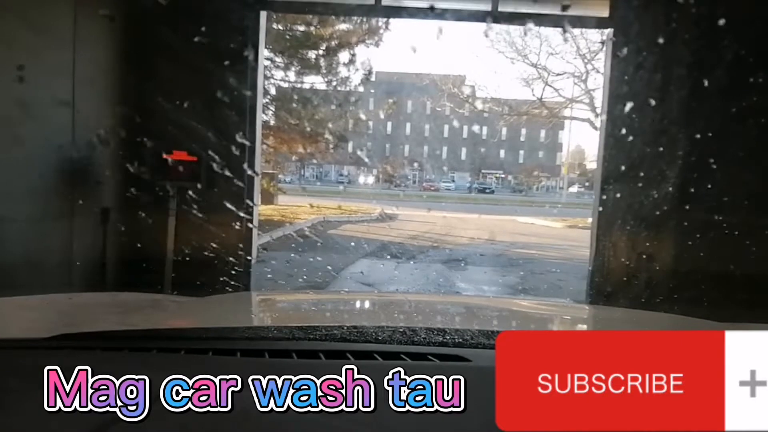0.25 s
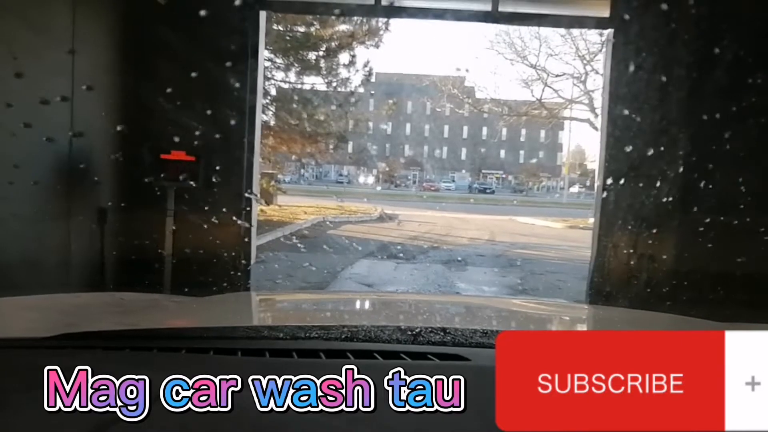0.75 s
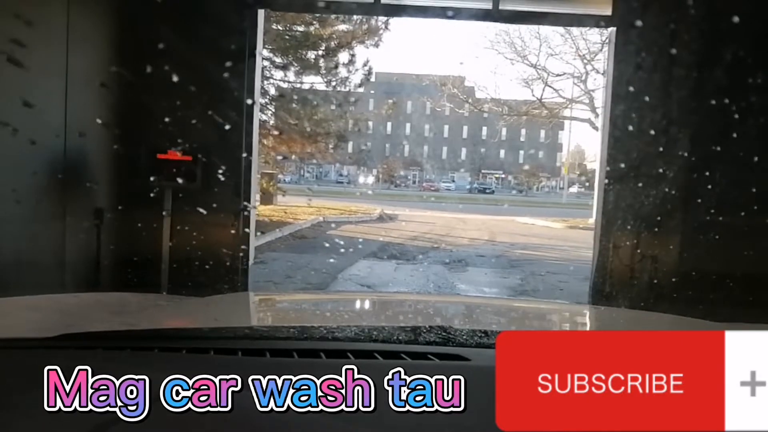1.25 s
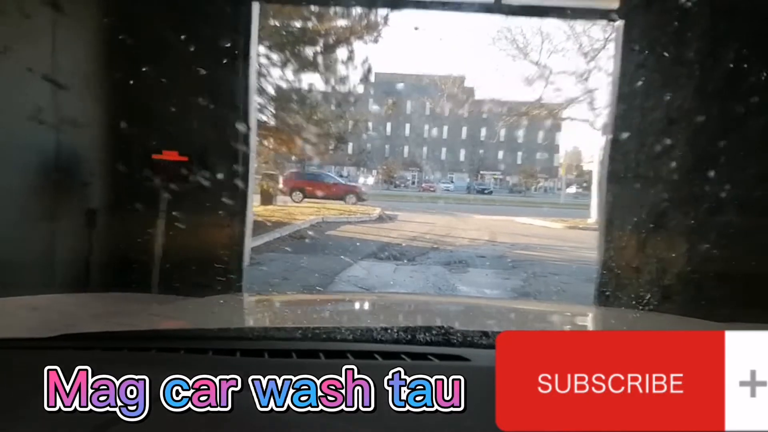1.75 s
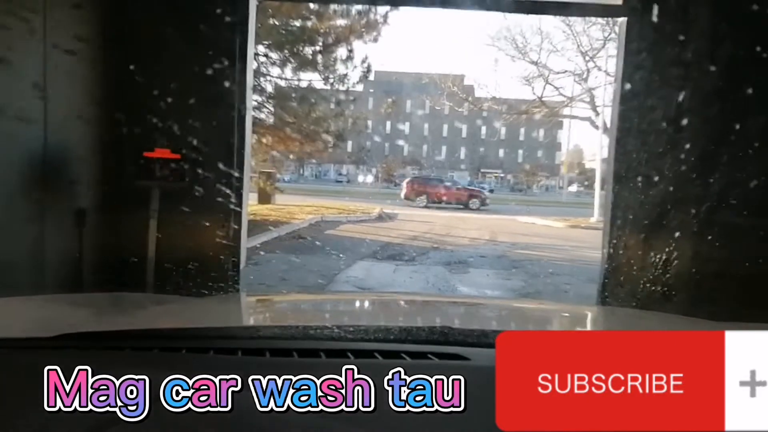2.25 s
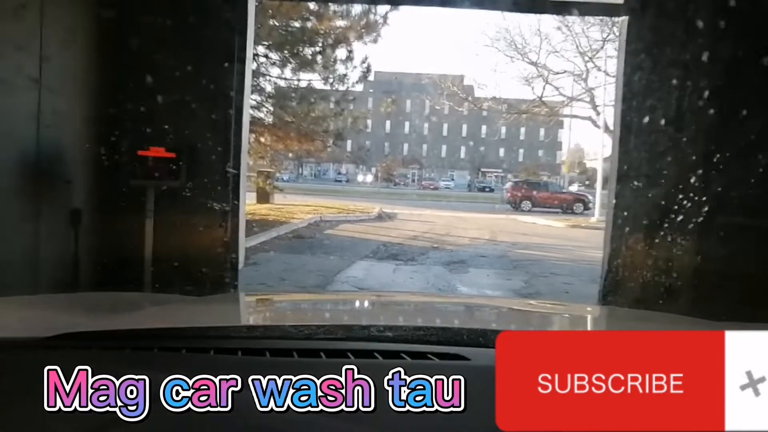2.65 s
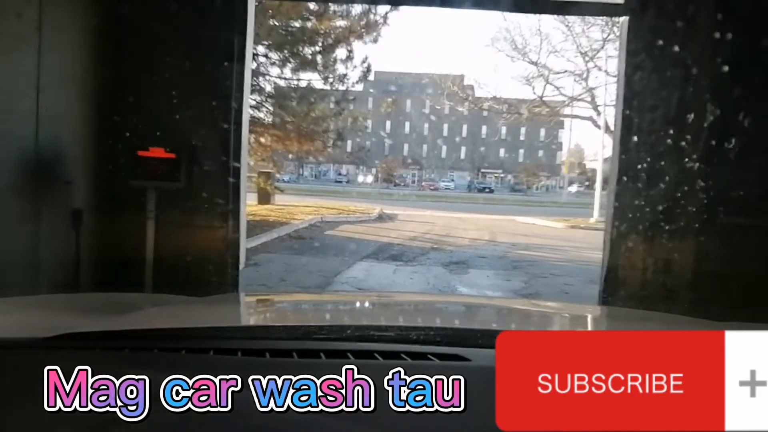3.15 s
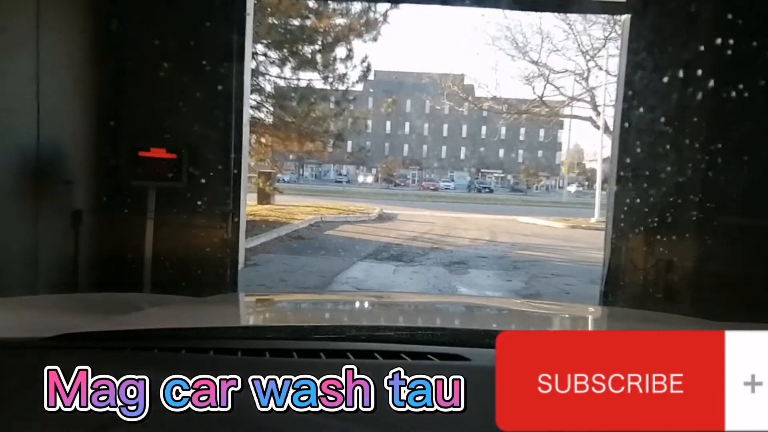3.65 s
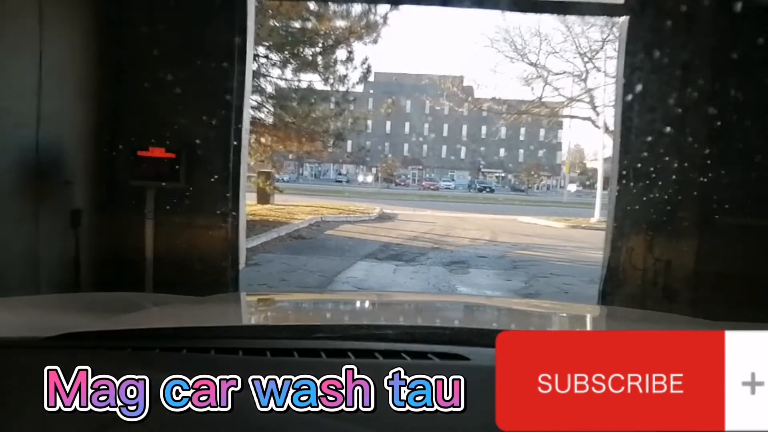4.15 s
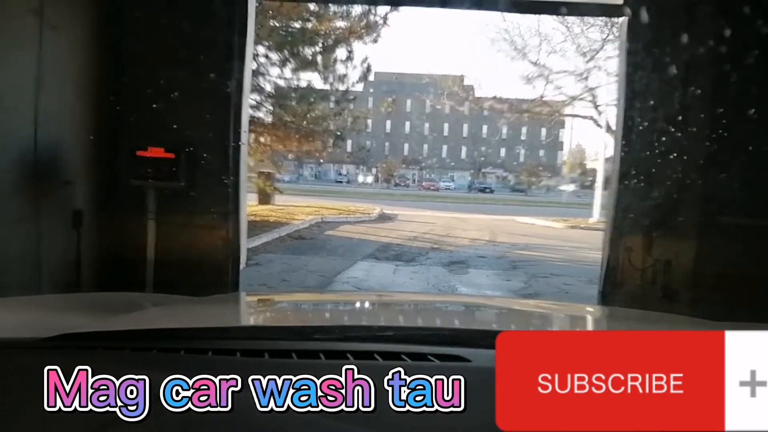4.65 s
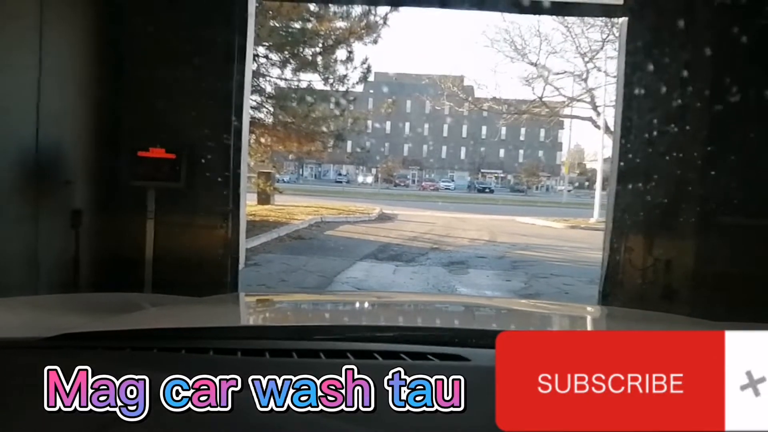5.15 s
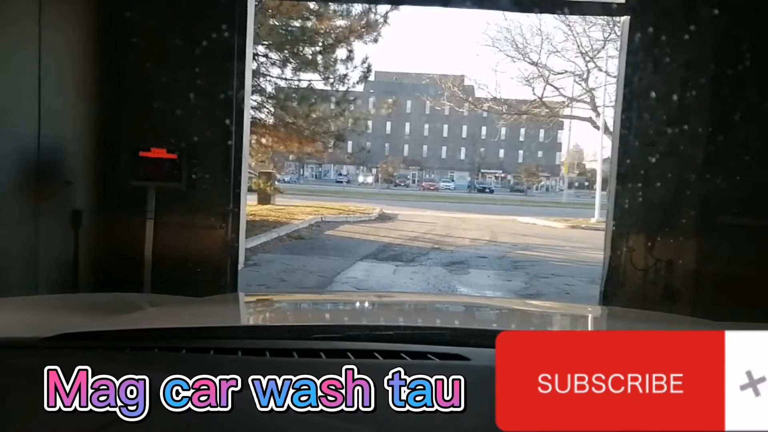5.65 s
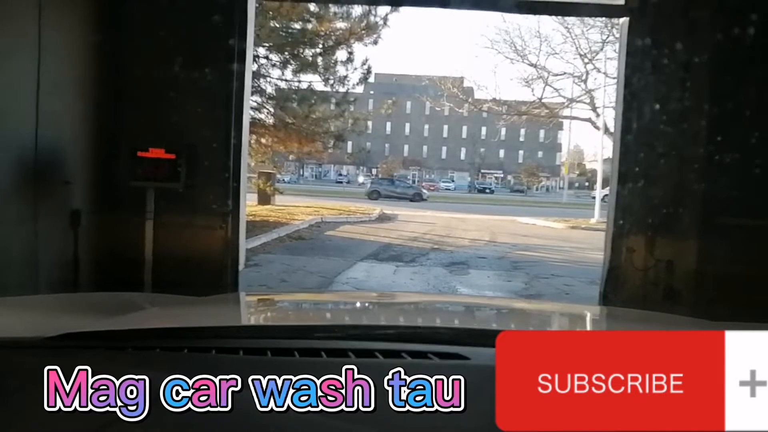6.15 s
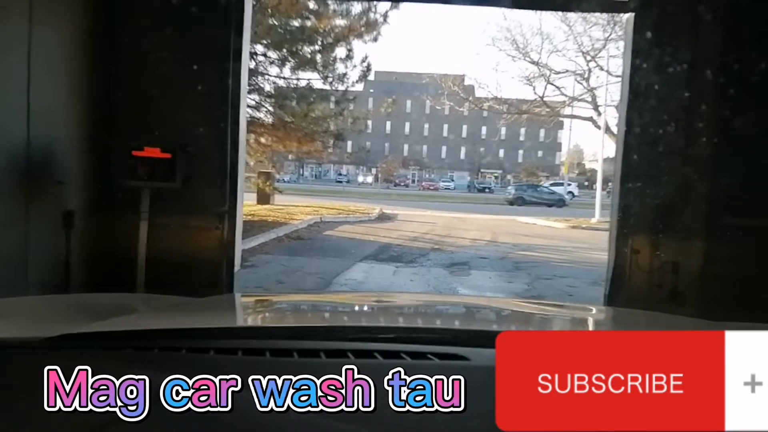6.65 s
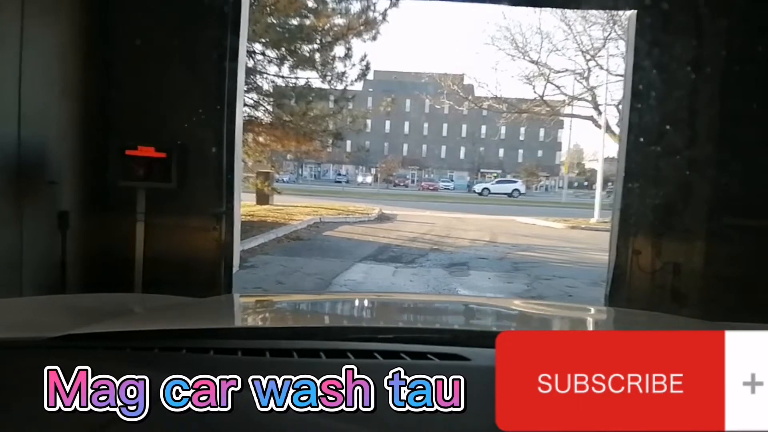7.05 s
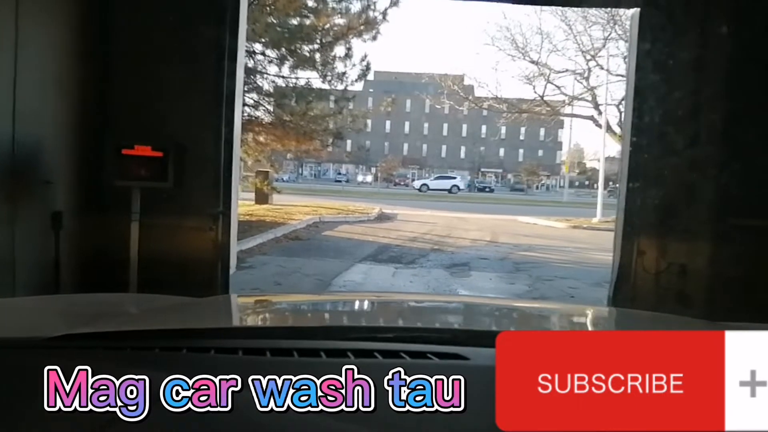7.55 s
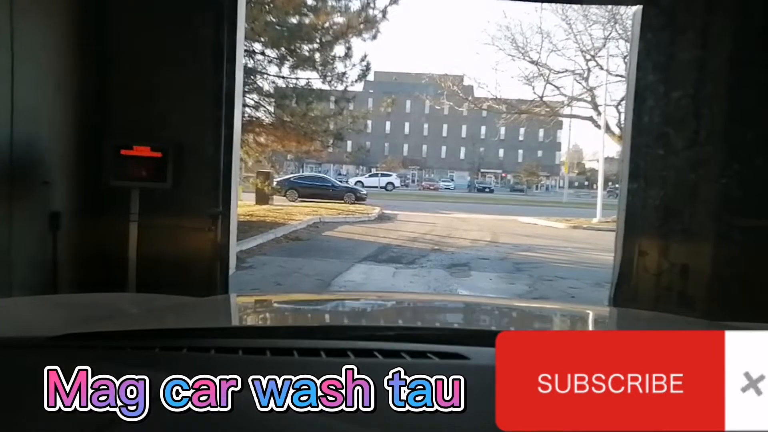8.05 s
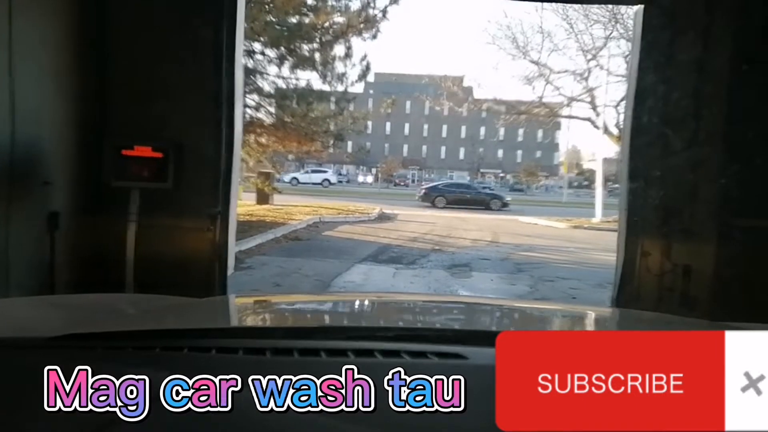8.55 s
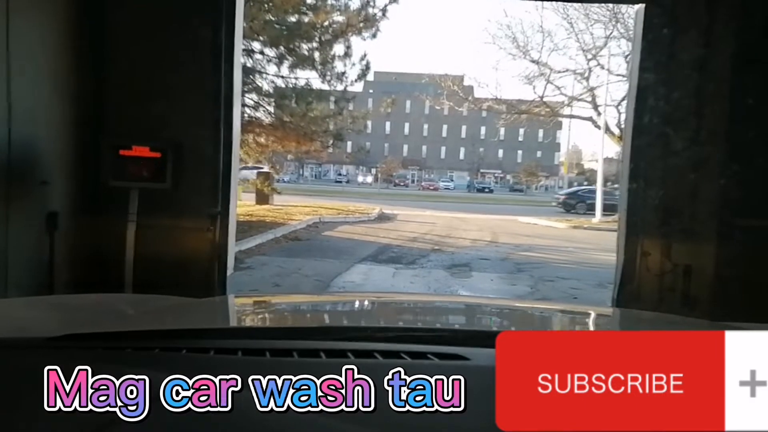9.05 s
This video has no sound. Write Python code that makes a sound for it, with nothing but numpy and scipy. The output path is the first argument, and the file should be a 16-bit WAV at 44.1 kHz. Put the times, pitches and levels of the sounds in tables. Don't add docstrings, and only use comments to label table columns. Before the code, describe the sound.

Close to the cabin microphone, two plastic clicks and a low knock come at the very start, with light fabric friction. Around them, large air blowers outside push a steady, heavy rush over the car: boomy low resonance, muffled wind through glass, soft hiss, a faint unsteady fan hum and airy whistling brushes. The blast grows stronger toward the middle, becomes choppy around seven seconds, then continues to the end without stopping.

```python
import sys
import numpy as np
from scipy import signal
from scipy.fft import rfft, irfft
from scipy.io import wavfile
from scipy.ndimage import uniform_filter1d

SR = 44100
rng = np.random.default_rng(int(sys.argv[2]) if len(sys.argv) > 2 else 0)


def digitize_waveform(pressure):
    field = np.atleast_2d(pressure).T
    bounded = np.clip(field, -1, 1)
    quanta = np.round(bounded * 32767).astype(np.int16)
    wavfile.write(sys.argv[1], SR, quanta)


def elevation(decibels):
    levels = np.asarray(decibels, float)
    return 10 ** (levels / 20)


N = 409688


def evened(x):
    return x / np.sqrt(np.mean(abs(x) ** 2) + 1e-20)


def read(points, hz):
    f, value = np.transpose(points)
    return np.interp(np.log(hz + 1), np.log(f + 1), value)


def coarse_times():
    return np.arange(0, N + 64, 64) / SR


def drift(slow_hz, fast_hz, t):
    total = 0
    for f in np.geomspace(slow_hz, fast_hz, num=24):
        total = total + np.sin(2 * np.pi * (f * t + rng.random())) / np.sqrt(f)
    return evened(total)


def swells(rows, t, rise=1):
    total = 0
    for s, length, height in rows:
        span = np.where(t < s, rise * length, length)
        total = total + height * np.exp(-((t - s) / span) ** 2)
    return total


# pitch_hz, width_hz, lift_db, left_right_db
PANEL_MODES = [(344, 13, 1, 0.5), (520, 67, 0, 2), (630, 34, -1, -8.5), (814.6, 9.5, 8, -6),
               (870.3, 21, 7, 5), (1197, 41, 2, -6), (1320, 120, 3, -1.5), (1550, 220, -1, 3.5),
               (1766, 80, 3.5, 1), (2020, 100, 3, 2.5), (2700, 600, 1.5, -2), (4130, 300, -1.5, 0.5),
               (9600, 1200, -0.7, 4.5)]


def ringing(hz, column):
    total = 0
    for mode in PANEL_MODES:
        total = total + mode[column] / (1 + (2 * (hz - mode[0]) / mode[1]) ** 2)
    return total


# pitch_hz, coherence
PORT_COHERENCE = [(20, .7), (40, .94), (110, 0.85), (205, 0.99), (240, 0.74), (280, 1), (330, .7),
                  (520, 0.38), (950, 0.8), (1100, 0.11), (1800, 0.23), (2000, 0.45), (2200, 0.089),
                  (4000, .05)]
# pitch_hz, left_right_db
PORT_BALANCE = [(40, 2), (85, 0.5), (130, -0.5), (220, -1.9), (280, 0.5), (330, -2.5), (1000, 0.8),
                (2300, -1.1), (3200, -3), (5500, -3), (7500, -0.3), (12000, 2.5)]
# pitch_hz, lead_rad
PORT_LEAD = [(20, 0.3), (500, -0.27), (750, -0.46), (830, 2.5), (950, -0.12), (1200, -1.34), (1500, -1.5),
             (1700, 1.54), (2000, 0.2), (3000, 0.83)]


def air(colour, patchy_db, tilt_db=None, size=2048):
    hop, hz = size // 4, np.fft.rfftfreq(size, 1 / SR)
    hz = hz[hz < colour[-1][0]]
    a, b, c, d, patches = rng.standard_normal((N // hop + 5, len(hz), 5)).T
    patches = uniform_filter1d(patches, size=size // 100, axis=0)
    patches = evened(uniform_filter1d(patches, size=12288 // size, axis=1))
    same = np.clip(read(PORT_COHERENCE, hz), 0, 1)[:, None]
    balance_db = read(PORT_BALANCE, hz) + ringing(hz, column=3)
    lean = (elevation(balance_db / 2) * np.exp(.5j * read(PORT_LEAD, hz)))[:, None]
    left = a + 1j * b
    right = same * left + np.sqrt(1 - same ** 2) * (c + 1j * d)
    shape = elevation(read(colour, hz) + ringing(hz, column=2))[:, None] * np.ones(a.shape)
    if tilt_db is not None:
        power = (shape ** 2).sum(0)
        tilt = np.interp(np.arange(a.shape[1]) * hop / SR, *tilt_db)
        shape = shape * elevation(np.outer(np.log2(hz + 20), tilt))
        shape = shape * np.sqrt(power / (shape ** 2).sum(0))
    spectra = np.zeros((2, size // 2 + 1, a.shape[1]), complex)
    spectra[:, :len(hz)] = np.array([left * lean, right / lean]) * shape * elevation(patchy_db * patches)
    x = signal.istft(spectra, nperseg=size, noverlap=size - hop)[1][:, :N]
    return x / np.sqrt(np.mean(x.mean(0) ** 2))


def driven(s, level_db, sound):
    return np.interp(np.arange(N) / SR, s, elevation(level_db)) * sound


# pitch_hz, level_db per Hz
CLOTH_SPECTRUM = [(4500, -28.5), (6000, -7), (7500, -1.5), (8400, -9), (9000, -1.5), (9600, -2.5),
                  (10300, -5.5), (11200, -9.5), (12500, -16.5), (13600, -18.5), (13950, -13.5),
                  (14300, -19), (15200, -29), (17000, -59)]
# peak_s, length_s, level_db over the hiss
CLOTH_RUBS = [(.32, 0.057, 6), (.42, 0.038, 7), (.54, .03, 6.5), (.77, .05, 10), (.86, 0.083, 8.5),
              (.92, 0.043, 10.5), (1.09, .07, 12.5), (1.86, .1, 5.5), (2.24, .02, 2.5), (4.68, 0.043, 1),
              (8.02, 0.094, 6.5), (8.74, 0.089, 8), (8.84, 0.09, 4), (9.12, 0.051, 1.5)]


def rustle():
    s = coarse_times()
    settling_db = 4.5 * np.exp(-s / 1.1)
    db = -79 + settling_db + swells(CLOTH_RUBS, s, rise=.5)
    grain = evened(uniform_filter1d(rng.standard_normal(N), size=90))
    level_db = np.interp(np.arange(N) / SR, s, db) + 1.6 * grain + 2.2
    return elevation(level_db) * air(CLOTH_SPECTRUM, 1.4, size=512)


def knock():
    height, pitch_hz, t60_s = 0.5, 53, 0.014
    t = np.arange(N) / SR
    return height * elevation(-60 * np.minimum(t / t60_s, 5)) * np.cos(2 * np.pi * pitch_hz * t)


# start_s, peak_db, rise_s, t60_s, left_right_db
CLICK_EVENTS = [
    (0.0, -41.5, 0.00033, 0.057, 1),
    (.273, -64.5, 0.00092, .03, -3),
    (0.2872, -42.5, 0.0047, 0.045, 0.5),
    (0.2993, -51.5, 0.0012, 0.026, -1),
    (2.142, -66, 0.00042, .02, -0.5),
]
# pitch_hz, level_db per Hz
PLASTIC_SPECTRUM = [(800, -30), (1500, -7.5), (2100, -3), (2900, -5.5), (3750, -1.5), (4500, -9.5),
                    (6000, -10.5), (8000, -15), (9600, -7), (11000, -14), (13500, -19), (15500, -21),
                    (17000, -63)]


def clicks():
    t = np.arange(4096) / SR
    colour = elevation(read(PLASTIC_SPECTRUM, np.fft.rfftfreq(len(t), 1 / SR)))
    out = np.zeros((2, N + len(t)))
    for start_s, peak_db, rise_s, t60_s, pan_db in CLICK_EVENTS:
        shared, left, right = rng.standard_normal((3, len(t)))
        burst = evened(irfft(rfft(.5 * shared + np.array([left, right])) * colour))
        decay_db = 60 * np.maximum(t - rise_s, 0) / t60_s
        burst = burst * elevation(peak_db + 7.0 - decay_db) * np.minimum(t / rise_s, 1) ** 2
        at = max(round(start_s * SR), 0)
        out[:, at:at + len(t)] += burst * elevation(np.array([[pan_db / 2], [-pan_db / 2]]))
    return out[:, :N]


# pitch_hz, level_db per Hz
SEAL_SPECTRUM = [(2200, -58.5), (2550, -8.5), (2700, 0.5), (2900, -4), (3100, -9.5), (3600, -62)]
# peak_s, length_s, level_db
SEAL_CROSSINGS = [
    (1.6, .2, 4),
    (1.98, .35, 11),
    (2.9, .25, 4),
    (4.5, 0.6, 3),
    (6.7, .6, 6),
    (7.9, 0.55, 7.5),
    (9.1, .4, 5),
]


def seal_whistle():
    level_db = -64.5 + swells(SEAL_CROSSINGS, np.arange(N) / SR)
    return elevation(level_db) * air(SEAL_SPECTRUM, 2.8, size=1024)


# peak_s, length_s, level_db
TONE_SWELLS = [(.55, 0.54, 9.5), (1.4, 0.12, 6.5), (2.3, 0.24, 11.5), (2.9, .3, 10), (3.7, .2, 7.5),
               (5.1, .4, 6.5), (6.4, 0.37, 10.5), (7.1, .2, 8.5), (7.7, 0.13, 8), (8.55, 0.17, 3),
               (9.1, .12, 9)]


def blade_tone():
    blade_hz = 525
    t = np.arange(N) / SR
    coarse, tone = t[::64], 0
    for off_hz, lead_rad, fan_db in [(-2.0, 0.78, -5), (0.23, -0.96, 2.0), (3.0, 2.0, -6.5)]:
        waver = np.interp(t, coarse, drift(1.5, 16, coarse))
        flutter = np.interp(t, coarse, drift(1.5, 16, coarse))
        turn = 2 * np.pi * np.cumsum(blade_hz + off_hz + 1.6 * waver) / SR
        tone = tone + elevation(fan_db + 1.7 * flutter) * np.cos(turn + [[lead_rad], [0]])
    level_db = -46.5 + np.interp(t, coarse, swells(TONE_SWELLS, coarse))
    return elevation(level_db + [[1.6], [-.4]]) * evened(tone)


# pitch_hz, level_db per Hz
HISS_SPECTRUM = [(900, -38.5), (1400, -2), (1600, -3), (2300, -7.5), (3300, -13.5), (4000, -15.5),
                 (4800, -21.5), (5700, -23.5), (6200, -30.5), (7000, -32.5), (7700, -35.5), (8300, -42.5),
                 (9500, -60), (12000, -120)]


def hiss(s, travel, blast_db, swing_db, flutter):
    crossing_db = swells(SEAL_CROSSINGS, s)
    level_db = -47.5 + 0.47 * (blast_db + swing_db) + 2.5 * travel + 0.107 * crossing_db + 0.48 * flutter
    tilt = 1.9 - 2.8 * travel + 0.086 * crossing_db
    return driven(s, level_db, air(HISS_SPECTRUM, 1.0, (s, tilt), size=1024))


# pitch_hz, level_db per Hz
RUSH_SPECTRUM = [(180, -37), (310, -2), (422, -1.5), (484, -6), (530, -4.5), (612, -8), (767, -12.5),
                 (905, -12), (1120, -16), (1270, -23), (1390, -19.5), (1600, -30), (2080, -55.5),
                 (3520, -120)]
# peak_s, length_s, tilt_db per octave
RUSH_TILTS = [
    (.6, .5, -2),
    (1.7, .6, -0.5),
    (3.6, .4, 1.6),
    (6, 0.33, -1),
    (7.2, 0.46, 2.5),
]


def rush(s, travel, glass_db, blast_db, swing_db, flutter):
    level_db = glass_db + swing_db + 0.23 + .79 * flutter
    tilt = -1.2 + 0.26 * blast_db + 1.2 * travel + swells(RUSH_TILTS, s)
    return driven(s, level_db, air(RUSH_SPECTRUM, 1.0, (s, tilt)))


# pitch_hz, level_db per Hz
BOOM_SPECTRUM = [(50, -37), (68, -12.5), (86, -2), (104, -3.5), (118, -1), (135, -2.5), (180, -6),
                 (197, -0.5), (217, 0.5), (232, -7.5), (280, -9), (305, -20), (350, -23.5), (600, -110)]
# peak_s, length_s, tilt_db per octave
BOOM_TILTS = [
    (1.5, .6, 4.5),
    (3.6, .3, 0.5),
    (7, 0.51, 2),
    (7.8, 0.27, -2),
]


def boom(s, roof_db, swing_db):
    tilt = -0.68 + swells(BOOM_TILTS, s)
    return driven(s, roof_db + swing_db + .38, air(BOOM_SPECTRUM, 0.22, (s, tilt), size=4096))


# pitch_hz, level_db per Hz
BUFFET_SPECTRUM = [(10, -35.5), (20, -19.5), (28, -17.5), (43, -1), (50, 2), (58, 2.5), (68, -7.5),
                   (80, -16), (110, -52.5), (160, -120)]


def buffeting(s, swing_db):
    tail_db = 4.5 / (1 + np.exp((6.9 - s) / .4))
    return driven(s, -27.5 + tail_db - .4 * swing_db, air(BUFFET_SPECTRUM, .3, size=4096))


# start_s, roof_push_db, glass_blast_db
JET_STRENGTH = [(0, -19, -34), (.5, -17, -30), (1.1, -17, -32), (1.7, -16.5, -31), (2.4, -14.5, -31.5),
                (3.05, -13.5, -29.5), (3.7, -14.5, -28.5), (4.2, -12.5, -29), (4.6, -15, -27),
                (5.15, -12.5, -28.5), (5.7, -14.5, -29), (6.3, -14, -27.5), (6.75, -14, -25.5),
                (7.2, -14, -28.5), (7.6, -15, -29.5), (8.1, -16.5, -30), (8.7, -15, -29.5),
                (9.29, -15.5, -30.5)]
# peak_s, length_s, roof_db,
# glass_db
LEVEL_SWINGS = [(3.56, 0.035, 4, 1), (3.794, 0.057, -4, 1), (4.214, 0.12, 0, -2.5), (5.326, 0.028, -1.5, 1.5),
                (5.39, .03, 1.5, -0.5), (6.544, 0.016, -8.5, 0.5), (6.811, 0.034, 4, 1), (7.159, .04, -6.5, 2),
                (7.202, 0.028, 7.5, 1), (7.288, 0.043, -4.5, -3.5), (7.38, 0.036, 2, -1),
                (7.13, 0.0053, .3, 3.5), (7.425, .005, -1, 5), (4.475, 0.0073, 4, 1.5),
                (4.584, 0.087, -0.5, 0.9), (5.019, .02, -0.5, 3.5), (9.002, .05, 1, 1), (7.555, .05, -1, 4),
                (7.744, 0.035, -0.5, -5), (8.127, 0.025, -3.5, -2), (8.193, 0.022, 4.5, 7),
                (8.213, .02, 0, -8), (8.716, 0.022, -2.5, 1), (8.744, .015, 0, -1)]


def blowers():
    s = coarse_times()
    travel = s * SR / N
    start_s, roof_push_db, glass_blast_db = np.transpose(JET_STRENGTH)
    roof_db = np.interp(s, start_s, roof_push_db)
    glass_db = np.interp(s, start_s, glass_blast_db)
    swings = np.array(LEVEL_SWINGS)
    roof_swing_db = swells(swings[:, [0, 1, 2]], s)
    glass_swing_db = swells(swings[:, [0, 1, 3]], s)
    blast_db = glass_db + 29
    flutter = drift(8, 40, s)
    low = buffeting(s, roof_swing_db) + boom(s, roof_db, roof_swing_db)
    high = rush(s, travel, glass_db, blast_db, glass_swing_db, flutter)
    return low + high + hiss(s, travel, blast_db, glass_swing_db, flutter)


def scene():
    return rustle() + knock() + clicks() + seal_whistle() + blade_tone() + blowers()


def low_pass(x):
    return signal.sosfilt(signal.butter(12, 14900, fs=SR, output="sos"), x)


def record(dry):
    limited = 1.6 * np.tanh(dry / 1.6)
    return low_pass(limited)


dry = scene()
out = record(dry)
digitize_waveform(out)
```